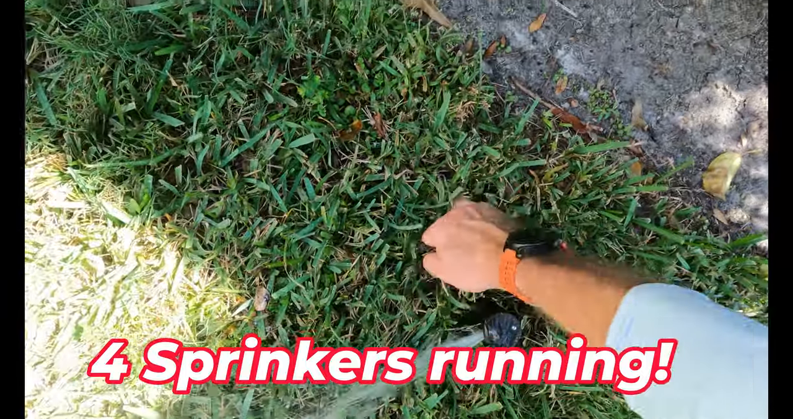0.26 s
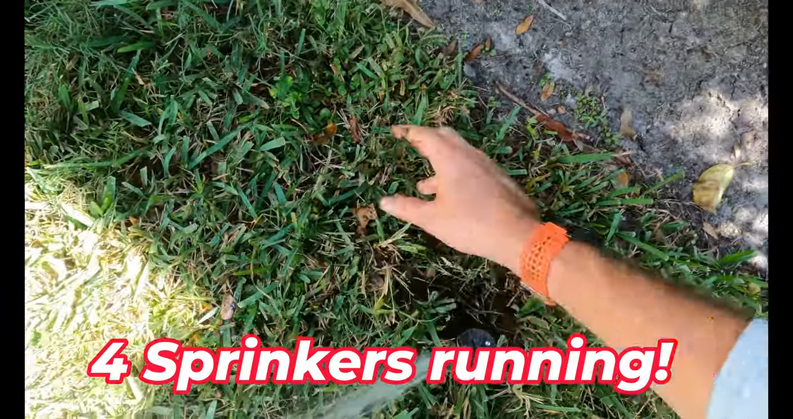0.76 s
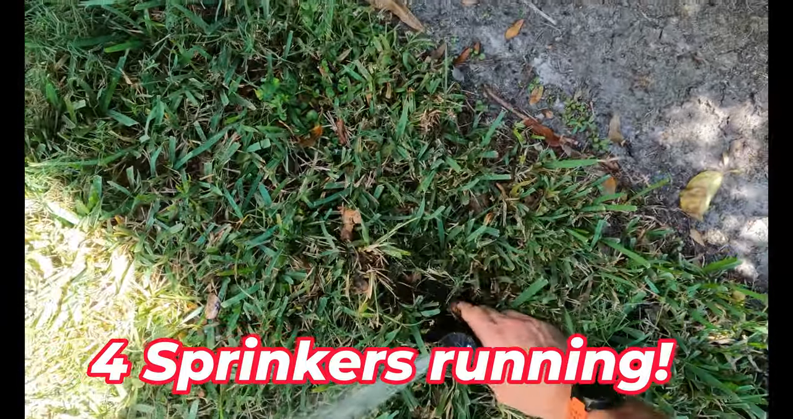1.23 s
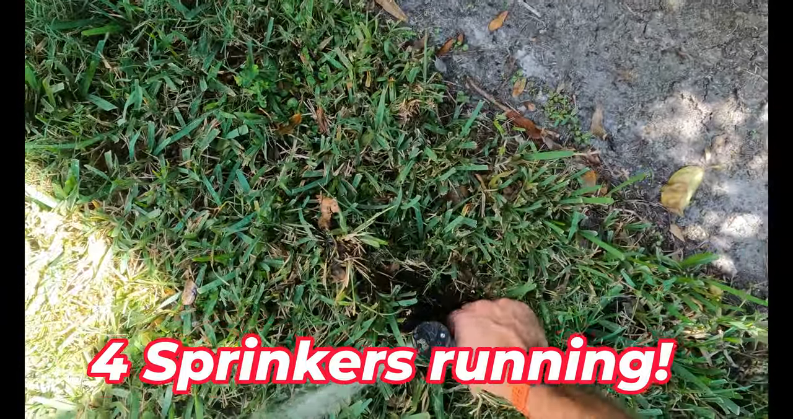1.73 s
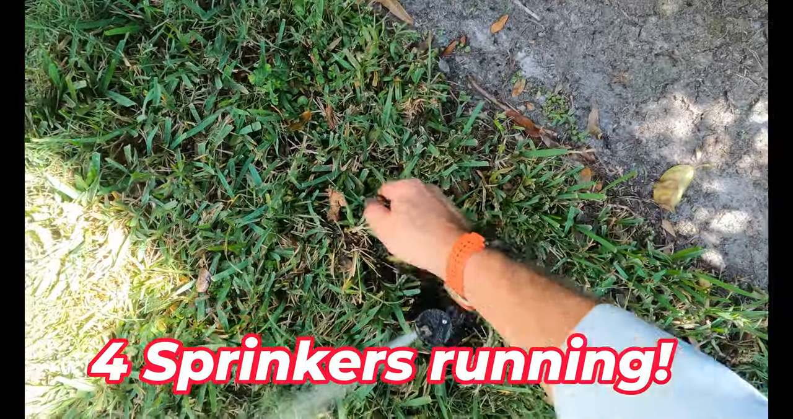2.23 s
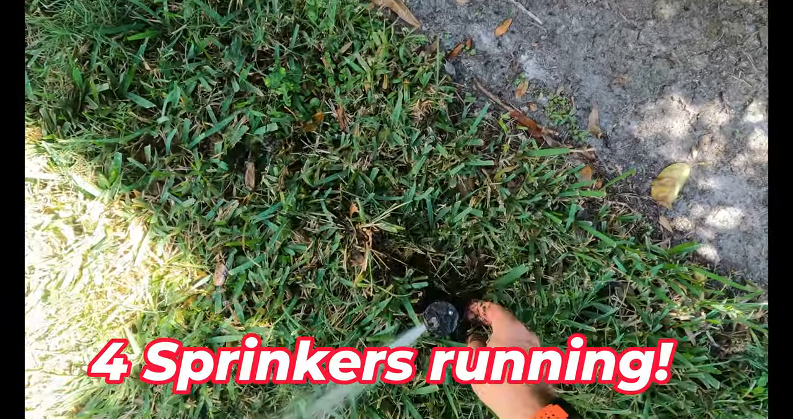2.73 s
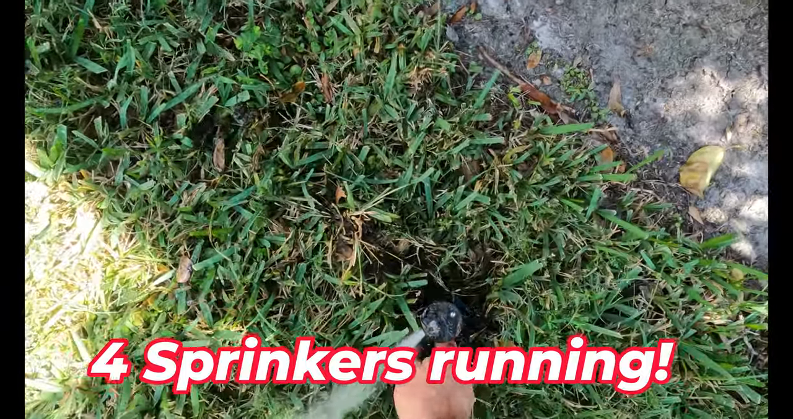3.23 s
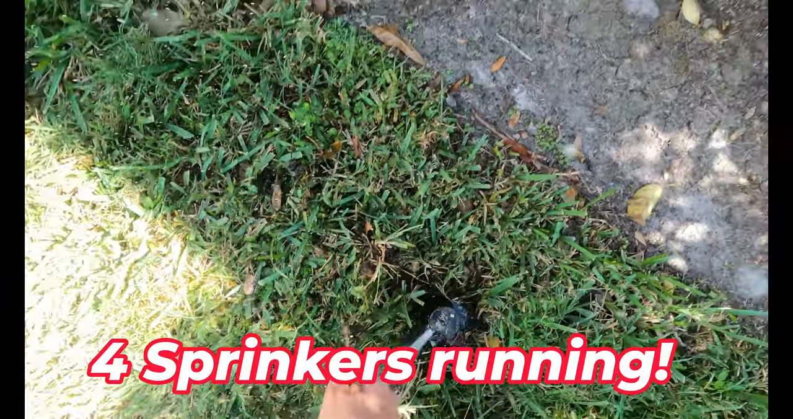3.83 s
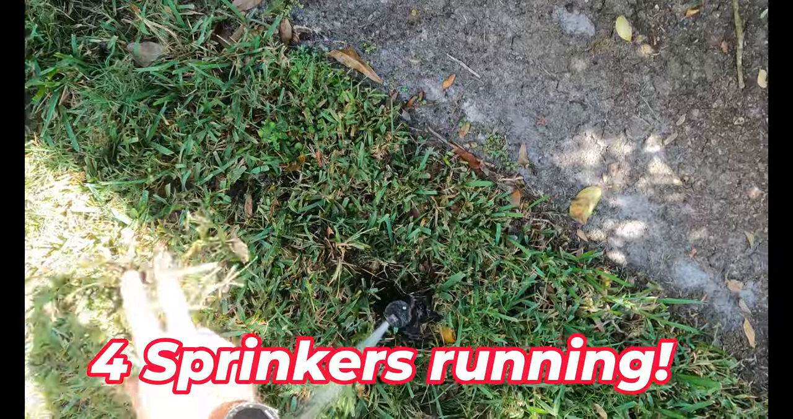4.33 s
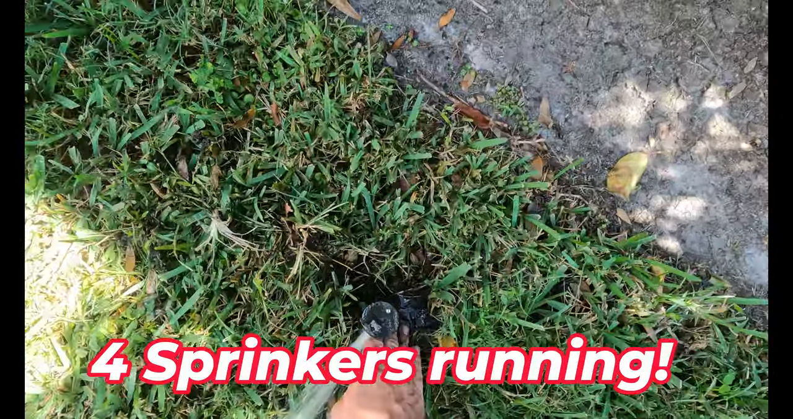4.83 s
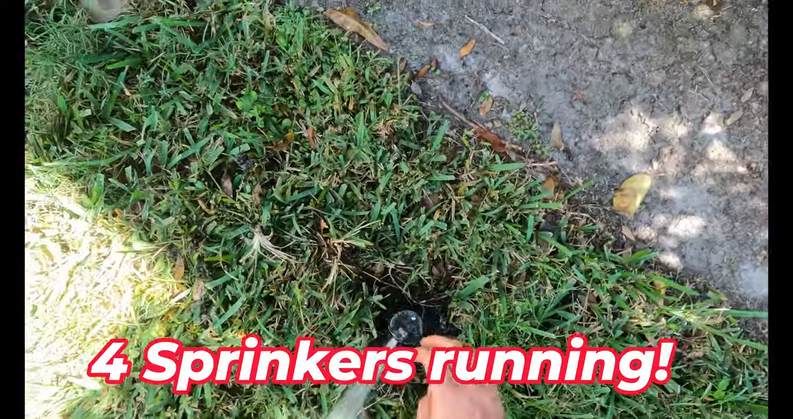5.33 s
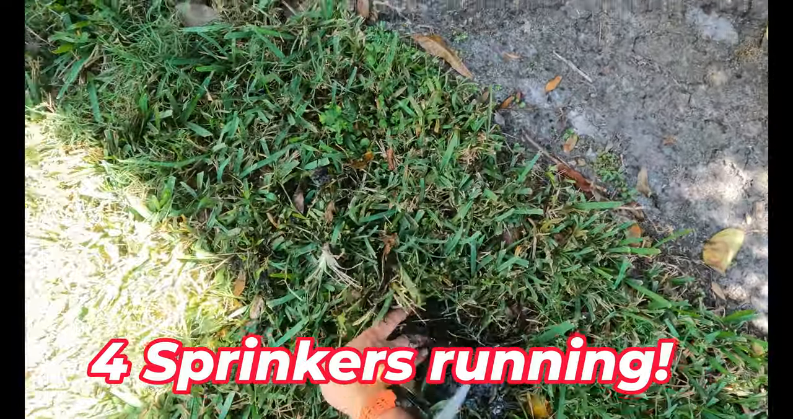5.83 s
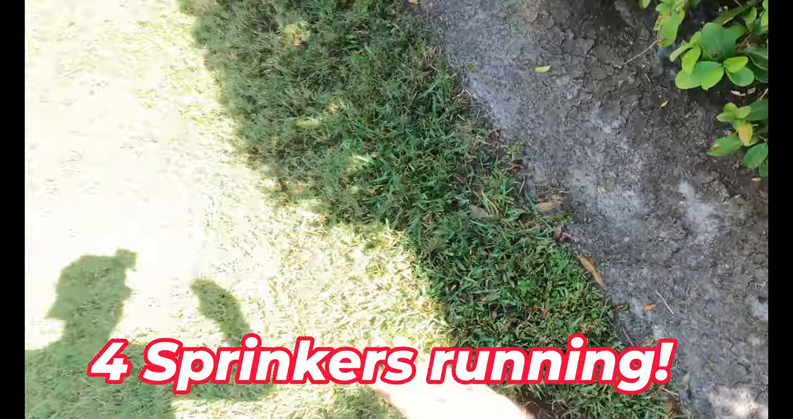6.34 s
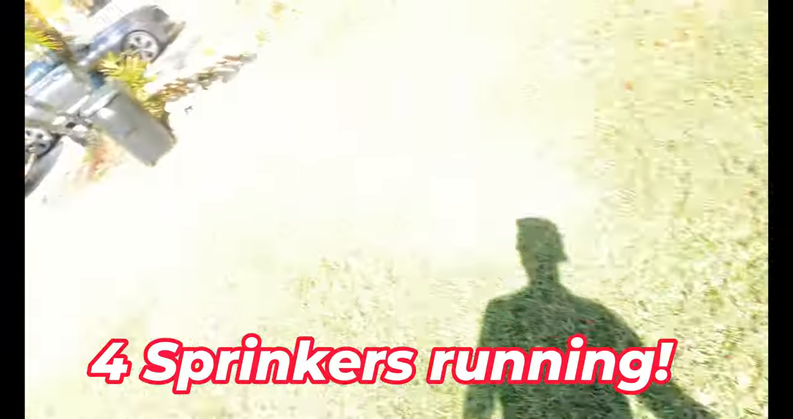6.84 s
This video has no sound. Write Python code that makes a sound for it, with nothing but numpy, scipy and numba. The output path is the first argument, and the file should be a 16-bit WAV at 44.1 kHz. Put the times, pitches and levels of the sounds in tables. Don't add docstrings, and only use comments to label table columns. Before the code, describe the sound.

In a yard, a head-worn microphone hears a sprinkler at arm's length. At first traffic rumble swells with a low drone that quickly fades, a far motor throbbing beneath and other nozzles hissing softly. Fingers tick on plastic at about 0.1-0.2 and 0.7-0.95 seconds, while single crisp spits puff from 0.35, crowding together from 1.0 to 1.4. Around 1.6 sharp slugs of water break out and by 1.7 a loud, bright, ragged hiss runs, fluttering with air pockets, gurgling and bubbling in the soil. A hand keeps shifting its colour; it pinches and spurts near 3.75 and is briefly covered around 4.55. From 5.2 to 5.44 it chokes into crackling spurts, then snaps back. After 6.1 it breaks up and weakens to scattered, brighter puffs by 6.3-6.85, until a fresh spray bursts at 6.95 as traffic rises again.

```python
import sys
import numpy as np
from scipy import signal
from scipy.fft import rfft, irfft
from scipy.io import wavfile
from scipy.ndimage import uniform_filter1d
from numba import njit

SR = 44100
rng = np.random.default_rng(int(sys.argv[2]) if len(sys.argv) > 2 else 0)


def master(y):
    cut = np.clip(np.atleast_2d(y).T, -1, 1)
    pcm = np.round(cut * 32767)
    wavfile.write(sys.argv[1], SR, pcm.astype(np.int16))


def gain_from_decibels(decibels):
    exponent = np.asarray(decibels, float) / 20
    return 10 ** exponent


N = 311742

# t/s, rumble level/dB
TRAFFIC = [(0, -26.5), (.33, -23.5), (.63, -24), (.8, -24), (1.2, -24.5), (1.5, -24.5), (2.1, -29),
           (4.2, -31), (4.6, -29.5), (5.8, -31), (7.07, -27)]
# t/s, level/dB
WATER = [(0, -51.5), (1.61, -43.5), (1.622, -35), (1.685, -31), (1.7, -23), (3.6, -24.5), (3.835, -27),
         (3.85, -25.5), (5.1, -24), (5.19, -25.5), (5.28, -30.5), (5.34, -34.5), (5.443, -35.5),
         (5.447, -22), (5.7, -24.5), (6.11, -25), (6.128, -29.5), (6.26, -36), (6.48, -49), (6.87, -48.5),
         (6.95, -28.5), (7.07, -24)]
# start t/s, length/s, whole jet level/dB, upper three resonances
# level/dB
HAND_SHADOWS = [
    (1.4, 0.47, 0, 4.5),
    (2.62, 0.22, 0, 2.5),
    (3.7, 0.27, -2.5, -4),
    (4.2, 0.31, 2.5, -4),
    (4.5, 0.17, -9.5, 4),
    (4.64, 0.46, 1, -1.5),
    (5.1, 0.41, 0, 5),
    (5.95, 0.49, -7, 8),
    (6.44, 0.3, 0.5, -19),
    (6.8, 0.18, 1.5, 10),
]
# t/s, first dip f/Hz, second dip f/Hz, dip depth 0-1, low resonance level/dB
HAND_PLACE = [(1.6, 2740, 6450, 0.2, -8), (1.8, 2940, 6500, 0.7, -5.5), (1.93, 3440, 6400, 0.8, -6),
              (2.05, 3640, 6300, 0.7, -7.5), (2.6, 3700, 6560, 0.6, -5.5), (3.12, 3620, 6550, 0.2, -8),
              (3.15, 4600, 6600, 1, -4), (3.35, 4300, 6450, 0.7, -3.5), (3.5, 4400, 6440, 0.4, -2.5),
              (3.56, 3220, 5400, 0.8, -2), (3.71, 3420, 5600, 0.1, 0), (3.79, 3040, 5100, 0.8, -4.5),
              (3.95, 3620, 6450, 0.65, -3), (4.5, 3630, 5830, 0.6, -10.5), (4.65, 3800, 6230, 0.37, -9),
              (5.08, 3570, 6000, 0.9, -4), (5.13, 3020, 6700, .8, -6.5), (5.25, 2840, 6300, 0.9, -20),
              (5.4, 2920, 5730, 0.5, -14), (5.48, 3760, 6060, 0.37, -8.5), (6.1, 3830, 6000, 0.97, -8),
              (6.14, 3450, 5700, 0.6, -8.5), (6.85, 3700, 5600, 0.9, -1), (6.95, 3600, 5260, .8, -8),
              (7.03, 3760, 6300, .8, -3.5)]
# t/s, dip f/Hz, dip f/Hz, dip depth 0-1, third resonance f/Hz
HEAD_PLACE = [(0, 8650, 10800, .6, 7850), (1.7, 8900, 10760, 0.8, 7520), (2.4, 8650, 10400, 0.4, 7550),
              (2.95, 9100, 10600, 0.4, 7650), (3.3, 8900, 10200, 0.5, 7670), (3.6, 8450, 10200, 0.1, 7730),
              (3.95, 8400, 10200, 0.65, 7500), (4.5, 8540, 10100, 1, 7680), (4.7, 8600, 10600, 0.45, 7650),
              (5.08, 8150, 10300, 0.5, 7620), (5.2, 9200, 10800, 0.45, 7570),
              (5.47, 8350, 10400, 0.6, 7530), (5.8, 8700, 10400, 0.66, 7870),
              (6.2, 8800, 10500, 0.04, 7520), (7.0, 8340, 10700, .8, 7630)]


def unit(x):
    return x / np.sqrt(np.mean(x ** 2))


def curves(table):
    s, *columns = np.transpose(table)
    return [np.interp(np.arange(N) / SR, s, c) for c in columns]


def swells(table):
    s, length, *columns = np.transpose(table)[:, :, None]
    progress = np.clip((np.arange(0, N, 64) / SR - s) / length, 0, 1)
    swell = np.sin(np.pi * progress) ** 2
    return [np.repeat((swell * c).sum(axis=0), 64)[:N] for c in columns]


def over_hz(table):
    hz, value = np.transpose(table)
    return np.interp(np.log(np.arange(N // 2 + 1) * SR / N + 1), np.log(hz), value)


def colour(x, table):
    return irfft(rfft(x) * gain_from_decibels(over_hz(table)), N)


@njit
def svf(x, hz, width):
    y, b, l = np.empty(len(x)), 0., 0.
    for i in range(len(x)):
        g, k = np.tan(np.pi * hz[i] / SR), width / hz[i]
        v = (b + g * (x[i] - l)) / (1 + g * (g + k))
        b, l, y[i] = 2 * v - b, l + 2 * g * v, k * v
    return y


def ring(x, hz, width):
    hz, width = hz + np.zeros(N), 1. * width
    rung = np.array([svf(svf(row, hz, width), hz, width) for row in x])
    return rung / np.sqrt(np.pi * width / SR / 2)


def walk(rate):
    k = max(int(SR / rate), 1)
    steps = np.repeat(rng.standard_normal(N // k + 1), k)
    return unit(uniform_filter1d(uniform_filter1d(steps, k), k)[:N])


def flicker():
    return 0.27 * walk(12) + 0.73 * walk(140)


def bursts(table, decay_s):
    kick = np.zeros(N)
    kick[(table[:, 0] * SR).astype(int)] = gain_from_decibels(table[:, 1])
    return signal.lfilter([1], [1, -np.exp(-1 / (decay_s * SR))], kick)


def delayed(x, delay_ms):
    heard_at = np.arange(N) - delay_ms * SR / 1000
    return np.array([np.interp(heard_at, np.arange(N), row) for row in x])


def flow():
    return curves(WATER)[0] + swells(HAND_SHADOWS)[0]


def yard():
    # f/Hz, level per Hz/dB
    hiss_colour = [(180, -3.5), (300, -0.5), (411, -3.5), (461, -1.5), (517, -4), (1390, -2.5),
                   (1540, -8.5), (1640, -5.5), (2520, -11.5), (4800, -14.5), (10800, -13), (11900, -4.5),
                   (15500, -64)]
    street_db = 0.35 * (curves(TRAFFIC)[0] + 30)
    hiss = unit(colour(rng.standard_normal((2, N)), hiss_colour))
    return gain_from_decibels(-41 + street_db + 0.15 * walk(11)) * hiss


def rumble():
    # f/Hz, level per Hz/dB
    rumble_colour = [(15, -24), (27, -1), (38, 1.5), (50, -7.5), (65, 3.5), (100, 3.5), (150, -11.5),
                     (200, -9.5), (300, -20.5), (420, -41)]
    # multiple of the turning rate, level/dB
    partials = [(1, -0.5), (2, -15), (3, 4), (4, -6)]
    motor_hz = 39.06
    body_db, t = curves(TRAFFIC)[0], np.arange(N) / SR
    body = unit(colour(rng.standard_normal((2, N)), rumble_colour))
    leaving = gain_from_decibels(8.5 - 23 * t) + gain_from_decibels(-11) + gain_from_decibels(-6.5 - 62 * abs(t - 1.4))
    drone = gain_from_decibels(-3) * leaving * ring(rng.standard_normal((2, N)), 135.0, 43)
    turn = np.cumsum(motor_hz * (1 + .03 * walk(5))) / SR
    motor = sum(gain_from_decibels(db + 3.5 * walk(11)) * np.sin(2 * np.pi * k * turn) for k, db in partials)
    motor_db = -40 + .5 * (body_db + 34.5)
    middle_only = np.array([[1], [0]])
    return gain_from_decibels(body_db - 0.5) * (body + drone) + gain_from_decibels(motor_db) * motor * middle_only


def rising_bubbles():
    out, t = np.zeros(N + SR), np.arange(SR // 30) / SR
    for at, pitch, size in rng.random((700, 3)):
        hz, start = 260 * 4.0 ** pitch, int(at * N)
        glide = 1 + 0.032 * t * hz
        shape = np.exp(-t * hz / 1.1) * np.sin(2 * np.pi * hz * t * glide)
        out[start:start + len(t)] += (0.045 + size) * shape
    return unit(out[:N])


def gurgle(chop):
    # t/s, peak level/dB
    splashes = [(1.85, -29), (2.158, -26.5), (2.232, -30), (2.8, -38), (2.997, -29.5), (3.273, -30),
                (3.352, -53), (3.66, -36), (3.91, -33), (4.16, -31), (4.245, -37), (4.77, -30), (4.97, -37),
                (5.682, -24), (5.88, -30)]
    noise = chop * gain_from_decibels(2.0 * walk(40)) * rng.standard_normal((2, N))
    splash = ring(noise, 642, 1340) + gain_from_decibels(-9.5) * ring(noise, 268, 226)
    low_db = curves(HAND_PLACE)[-1]
    steady = gain_from_decibels(-38 + 0.91 * (flow() + low_db + 34.0))
    landing = steady + uniform_filter1d(bursts(np.array(splashes), .025), 400)
    return gain_from_decibels(-4.5) * landing * (splash + gain_from_decibels(-2.5) * rising_bubbles())


def ticks():
    # t/s, peak level/dB, mode f/Hz, second mode f/Hz, 60 dB decay/s
    taps = [(0.096, -17, 3760, 4200, 0.0082), (0.1906, -24, 1680, 3200, 0.033),
            (0.1954, -35, 3600, 2620, 0.027), (0.192, -30, 3070, 3700, .03), (1.535, -31, 1990, 3780, .03),
            (1.584, -29, 1790, 3480, .03), (.212, -29, 3300, 3540, 0.022), (.6855, -26, 4430, 2000, 0.0073),
            (0.696, -26, 5040, 2500, 0.0069), (0.701, -24.5, 1810, 2200, 0.011),
            (0.709, -22, 4600, 2000, 0.0073), (.728, -13.5, 4900, 2000, 0.012),
            (.7285, -27, 1950, 3100, .03), (0.743, -26, 7600, 5000, 0.009), (0.934, -30, 1740, 1600, 0.018),
            (.9644, -26, 885, 1860, 0.02), (5.4048, -22, 3000, 4400, 0.008)]
    out, t = np.zeros(N), np.arange(SR // 20) / SR
    crack = ring(rng.standard_normal((1, N)), 2200, 3800)[0]
    for s, db, hz, second_hz, t60 in taps:
        t60, at = np.clip(t60, .004, .05), int(s * SR)
        fall = np.exp(-np.log(1000) * t / t60) * (1 - np.exp(-t / (0.0074 * t60)))
        modes = np.sin(2 * np.pi * hz * t) + .5 * np.sin(2 * np.pi * second_hz * t)
        out[at:at + len(t)] += gain_from_decibels(db) * fall * (modes + 0.5 * crack[at:at + len(t)])
    return np.array([out, 0.099 * out])


def spits():
    # t/s, peak level/dB, low share relative to the peak/dB
    early = [(0.3471, -24, -10), (0.393, -20, -22), (0.521, -20.5, -4), (0.674, -21, -21), (0.7277, -33, 3),
             (0.8315, -26, -15), (0.8767, -23, -4), (0.9283, -26, -2), (0.9807, -32, 5), (0.9916, -24, -7),
             (1.0045, -17.5, -8), (1.044, -20, -6), (1.061, -16.5, -9), (1.0854, -21, -12),
             (1.1226, -13.5, -5), (1.134, -15.5, -1), (1.1548, -17, -4), (1.176, -16, -8),
             (1.2166, -38, -14), (1.2408, -17, -6), (1.258, -15, -4), (1.282, -20, -12),
             (1.3117, -19.5, -5), (1.381, -24, -6), (1.3922, -20, -14), (1.4027, -17, -14), (1.5, -23, -18),
             (1.5873, -33, -3)]
    turned = [(6.2481, -14.5, 1), (6.282, -18, -1), (6.3095, -25, -1), (6.3293, -17.5, 0.5),
              (6.347, -26, 7), (6.3828, -24, 0), (6.419, -22, -1), (6.4387, -19.5, -15), (6.466, -20, -7),
              (6.5, -29, -20), (6.6085, -31.5, 10), (6.6462, -26, 2), (6.664, -22, -21), (6.678, -25, -12),
              (6.72, -29, -8), (6.745, -30, -7), (6.765, -26, -9), (6.78, -24, -8), (6.795, -25, -9),
              (6.83, -26, -10), (6.845, -28, -8), (6.555, -29, -6), (6.59, -29, -12), (6.8672, -36.5, 3),
              (6.8842, -44, -11)]
    rows, late = np.array([*early, *turned]), np.arange(N) > 3 * SR
    tilt_db = 4.5 * late
    noise = rng.standard_normal((2, N))
    high = uniform_filter1d(bursts(rows, 0.0027), 60) * noise
    low_rows = np.c_[rows[:, 0], rows[:, 1] + rows[:, 2]]
    low = uniform_filter1d(bursts(low_rows, 0.0042), 60) * noise
    puffs = gain_from_decibels(-6.0) * ring(low, 5340, 2600)
    puffs = puffs + gain_from_decibels(-6.5 - tilt_db) * ring(high, 7300, 2300)
    puffs = puffs + gain_from_decibels(-11.0 + tilt_db) * ring(high, np.where(late, 9300, 9700), 900)
    return puffs + gain_from_decibels(-7.5 - tilt_db / 2) * ring(high, 12050, 1500)


def sputter():
    # start t/s, length/s, level/dB
    gaps = [(1.747, 0.029, -2), (1.783, 0.0081, -6), (1.899, 0.0064, -2), (1.92, 0.016, -9),
            (1.985, 0.031, -2.5), (2.166, 0.033, -4.5), (2.241, 0.021, -8), (2.282, 0.0089, -9),
            (2.473, 0.019, -4), (2.53, 0.014, -4), (2.602, 0.031, -2.5), (2.654, 0.031, -7),
            (2.694, 0.01, -12), (2.759, 0.038, -3), (2.883, 0.018, -2), (3.004, 0.03, -1.5),
            (3.368, 0.015, 0), (3.45, 0.02, -5), (3.679, 0.022, -3.5), (3.832, 0.023, -7.5),
            (3.853, 0.003, -5.7), (3.856, 0.03, -1), (3.887, 0.03, -4.5), (3.965, 0.017, -11),
            (4.02, 0.0064, -2), (4.038, 0.027, -7), (4.139, 0.0069, -16), (4.188, 0.019, -5),
            (4.22, 0.006, -4), (4.258, 0.013, -7), (4.295, 0.017, -4), (4.677, 0.013, -4),
            (4.758, 0.02, -1.5), (4.933, 0.025, 0.5), (4.959, 0.008, -4), (5.048, 0.028, -3),
            (5.49, 0.011, -5), (5.504, 0.022, 1.5), (5.542, 0.013, -5), (5.651, 0.019, -2.5),
            (5.687, 0.018, -9), (5.714, 0.035, -3.5), (5.754, 0.025, -3.5), (5.96, 0.017, -3),
            (5.977, 0.014, -4)]
    drops = (rng.random(N) < 1100 / SR) * gain_from_decibels(np.minimum(29.0 * rng.exponential(size=N), 13))
    spikes = signal.lfilter([1], [1, -.85], drops)
    chop_db = 0.081 * walk(20.0) + 0.38 * walk(90) + 1.23 * walk(300)
    return unit(gain_from_decibels(chop_db) * (1 + .25 * spikes)) * gain_from_decibels(swells(gaps)[0])


def turbulence(chop):
    # t/s, peak level/dB
    slugs = [(1.6223, -11.5), (1.6298, -16), (1.634, -17), (1.6378, -13.7), (1.6476, -16), (1.6549, -15),
             (1.663, -14.4), (1.6687, -12), (1.6735, -17), (1.6829, -18.8), (1.694, -16), (1.6985, -14.3),
             (1.7022, -16), (1.7112, -14), (3.732, -21), (3.773, -15), (3.7847, -14), (3.832, -9.5),
             (3.8585, -14), (4.5037, -20), (4.5382, -11.5), (4.55, -11), (4.5629, -18), (4.5693, -16),
             (4.5827, -22), (4.587, -21.3), (4.5996, -19), (4.6115, -15), (4.6359, -19), (6.1236, -21),
             (6.136, -20), (6.1553, -23), (6.1656, -17), (6.1836, -25), (6.211, -28), (6.214, -22.5),
             (6.233, -24), (6.9337, -31), (6.95, -24), (6.9617, -10), (6.99, -12),
             (5.1577, -20), (5.169, -16.1), (5.1806, -14.2), (5.1936, -16.7), (5.198, -17), (5.2018, -10),
              (5.2244, -14.8), (5.2284, -6), (5.2336, -9), (5.2406, -12), (5.2537, -28), (5.2654, -12),
              (5.2688, -17.7), (5.2848, -18), (5.2884, -14), (5.2996, -13), (5.3109, -16), (5.3243, -20),
              (5.3273, -26), (5.34, -22), (5.3508, -13.5), (5.3574, -18), (5.3709, -14), (5.3821, -16),
              (5.3933, -24.1), (5.4062, -19), (5.4143, -14), (5.4209, -18)]
    starved = np.clip(0.1 * (-24 - curves(WATER)[0]), 0, 2)
    gasp_db = starved * np.minimum(walk(90), .6)
    snap_db = 14 + np.minimum(3 * rng.exponential(size=N), 7.5)
    snaps = (rng.random(N) < 260 / SR) * gain_from_decibels(snap_db) * rng.choice([-1, 1], N)
    rows = np.array(slugs)
    puffs = bursts(rows, .0013) * rng.standard_normal((2, N)) + 2.8 * bursts(rows, 1 / SR)
    hiss = chop * gain_from_decibels(gasp_db) * (rng.standard_normal((2, N)) + snaps)
    return hiss + puffs * gain_from_decibels(-5 - flow())


def nozzle_ladder(hiss):
    # start t/s, length/s, main level/dB, main f/Hz at the peak, third resonance level/dB
    pinches = [(1.57, 0.18, 0.5, 5360, 2), (1.663, 0.35, 1.5, 5350, 0.5), (2.476, 0.28, -3.5, 4950, 0.5),
               (2.925, 0.37, 2, 4860, -2), (3.2, 0.25, 1, 5260, 0), (3.38, 0.11, 1.5, 5030, 1),
               (3.6, 0.22, -2.5, 5140, -1.5), (3.708, 0.093, 9, 4300, 1), (3.761, .11, 10, 4600, 4.5),
               (3.843, 0.23, 2, 4640, 3), (4.08, 0.16, -1, 4700, 4), (4.2, 0.3, -5, 4800, -3),
               (4.86, 0.15, 1.5, 4890, -5), (5.083, 0.094, 1, 5260, 4), (5.15, 0.13, -1.5, 4400, 1.5),
               (5.227, 0.074, -2, 4500, 5), (5.284, 0.056, 6, 5400, -3), (5.366, 0.11, -5.5, 4480, 1),
               (5.766, 0.24, 5, 5100, -9), (5.93, 0.26, 4.5, 4950, -3), (6.05, 0.09, 6, 4900, -2),
               (6.126, 0.15, 6, 4800, 7), (6.452, 0.12, -3, 5250, -13), (6.937, 0.11, -4, 5400, 1)]
    # f/Hz, width/Hz, level/dB
    upper_three = [(9200, 4040, -2.5), (12130, 2800, -1.5), (14000, 3000, -12)]
    # t/s, lower f/Hz, lower level/dB, upper level/dB
    lip_ridges = [(1.6, 9660, -14.5, -18), (2.9, 9470, -14.5, -20), (3.2, 9470, -11, -17),
                  (3.6, 9700, -16, -6), (3.85, 9400, -19, -9), (4.1, 9430, -20, -11), (4.5, 9300, -19, -23),
                  (5.0, 9200, -27, -17), (5.5, 9300, -20, -26), (6.1, 9360, -14, -9), (6.3, 9300, -9, -12),
                  (6.8, 9300, -4, -13), (7.0, 9300, -14, -18)]
    main_hz, ridge_width_hz = 4890, 1050
    pinch_db, shift_hz, third_db = swells(np.array(pinches) - [0, 0, 0, main_hz, 0])
    top_db = -8.5 - 0.019 * pinch_db + swells(HAND_SHADOWS)[1]
    low_db, third_hz = curves(HAND_PLACE)[-1], curves(HEAD_PLACE)[-1]
    spray = gain_from_decibels(pinch_db + flicker()) * ring(hiss, main_hz + shift_hz, 2100)
    spray = spray - gain_from_decibels(low_db + flicker()) * ring(hiss, 2644, 2080)
    spray = spray - gain_from_decibels(-1.5 + third_db + flicker()) * ring(hiss, third_hz, 1650)
    for k, (hz, width, db) in enumerate(upper_three):
        spray = spray + (-1) ** k * gain_from_decibels(top_db + db + flicker()) * ring(hiss, hz, width)
    ridge_hz, ridge_db, upper_db = curves(lip_ridges)
    spray = spray + gain_from_decibels(ridge_db + flicker()) * ring(hiss, ridge_hz, ridge_width_hz)
    return spray - gain_from_decibels(upper_db) * ring(hiss, 12100, ridge_width_hz)


def hand_and_head_dips(spray):
    widths = [614, 740, 1010, 1100.]
    *hand_hz, hand_depth, _ = curves(HAND_PLACE)
    *head_hz, head_depth, _ = curves(HEAD_PLACE)
    depths = [hand_depth] * 2 + [head_depth] * 2
    for hz, width, depth in zip(hand_hz + head_hz, widths, depths):
        hz = hz * (1 + .008 * walk(12))
        deep = np.clip(depth + .15 * walk(21.22), 0, .92)
        spray = np.array([row - deep * svf(row, hz, width) for row in spray])
    return spray


def jet(chop):
    # t/s, delay/ms, share 0-1
    echo = [(0, 1.0, .1), (1.6, 1.13, .28), (1.97, 1.13, .24), (2.03, 1.02, .24), (2.9, 1.02, .24),
            (3.08, 1.0, .25), (3.14, .52, .2), (3.45, .52, .2), (3.58, .62, .2), (3.85, .6, .15),
            (3.95, .425, .25), (4.8, .425, .25), (5.08, .425, .12), (5.2, .9, .3), (5.45, .425, .25),
            (5.8, .425, .2), (6.1, .62, .3), (6.9, .42, .35)]
    # f/Hz, level/dB
    port = [(1000, -12), (1500, 1.5), (2000, 1), (3600, 1.5), (5000, -0.5), (6400, 3), (7700, -1.5),
            (8700, 2), (9700, 0), (10500, 6), (12000, -4.5), (13200, -4), (14400, 5), (15300, -6)]
    spray = hand_and_head_dips(nozzle_ladder(turbulence(chop)))
    delay_ms, share = curves(echo)
    dull = 0.41
    late = signal.lfilter([1 - dull], [1, -dull], delayed(spray, delay_ms))
    spray = spray + .26 * delayed(spray, 1.9 + .1 * walk(6))
    heard = (spray + share * late) / np.sqrt(1 + share ** 2)
    return colour(gain_from_decibels(flow() + 0.86) * heard, port)


def two_ports(mix):
    # f/Hz, share 0-1
    likeness = [(25, 0.95), (60, 1), (300, 0.96), (1000, 0.89), (3000, 0.97), (5000, 1), (8000, 0.93),
                (11500, 0.78), (12300, 0.65), (13000, 0), (15000, 0.1)]
    # f/Hz, level/dB
    balance = [(60, 0), (110, -0.5), (200, 0), (380, -3.5), (700, -1.5), (1290, 0), (2380, -3.5),
               (4400, -1.5), (8120, -0.5), (15000, -4.5)]
    # f/Hz, phase/rad
    lead = [(300, -0.04), (1000, -0.25), (2400, -0.68), (5000, -0.42), (7000, -0.57), (9000, 0.36),
            (12000, 0.057)]
    shared, apart = rfft(mix)
    like = np.clip(over_hz(likeness), 0, 1)
    skew = gain_from_decibels(over_hz(balance) / 2) * np.exp(.5j * over_hz(lead))
    shared, apart = shared * np.sqrt((1 + like) / 2), apart * np.sqrt((1 - like) / 2)
    return irfft(np.array([(shared + apart) * skew, (shared - apart) / skew]), N)


def scene():
    chop = sputter()
    background = yard() + rumble()
    return two_ports(background + gurgle(chop) + ticks() + spits() + jet(chop))


def roll_off(x):
    return signal.sosfilt(signal.butter(12, 15720, fs=SR, output="sos"), x)


def record(dry):
    rounded = np.tanh(1.615 * dry) / 2.057
    top_cut = signal.ellip(8, .2, 70, 15450, fs=SR, output="sos")
    return roll_off(signal.sosfilt(top_cut, rounded))


dry = scene()
out = record(dry)
master(out)
```